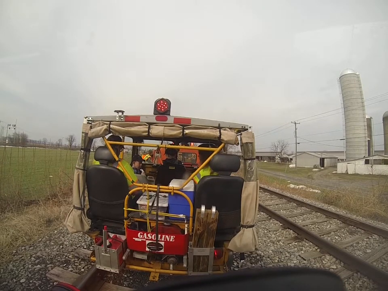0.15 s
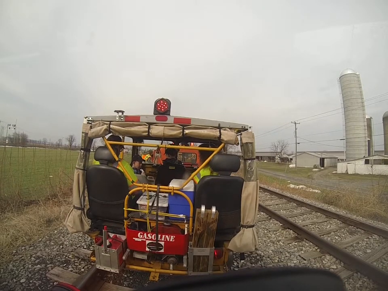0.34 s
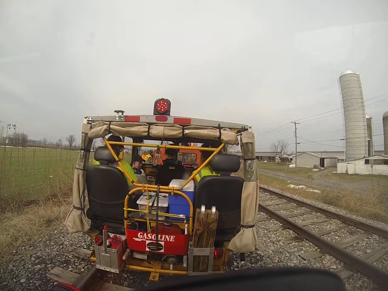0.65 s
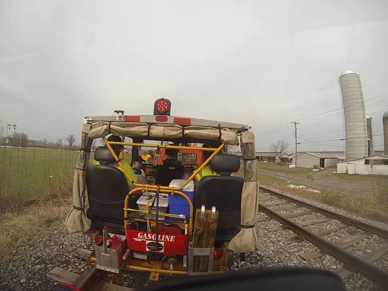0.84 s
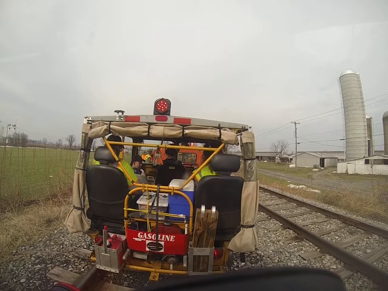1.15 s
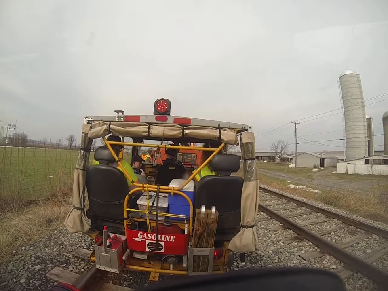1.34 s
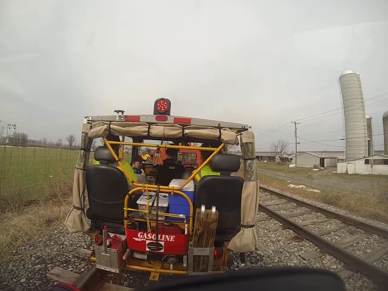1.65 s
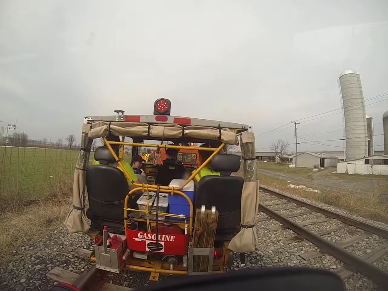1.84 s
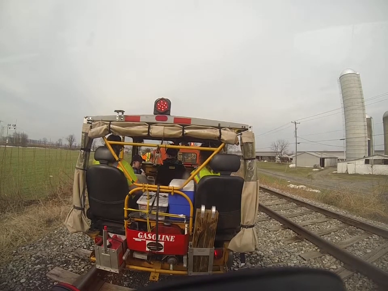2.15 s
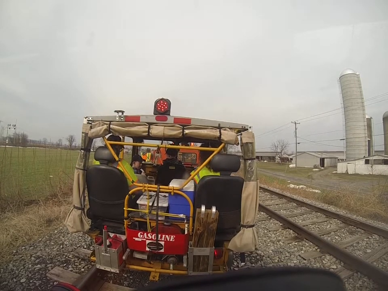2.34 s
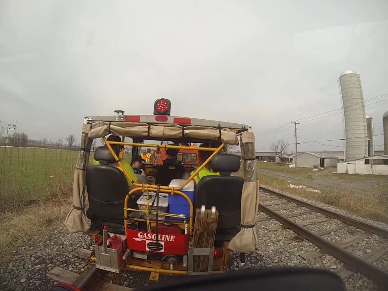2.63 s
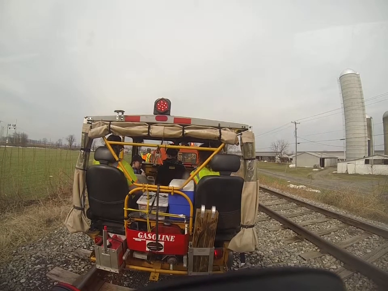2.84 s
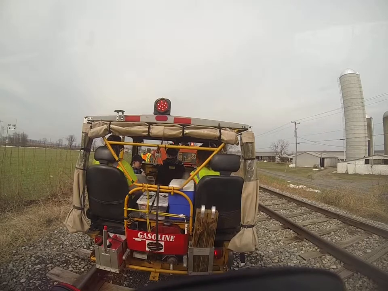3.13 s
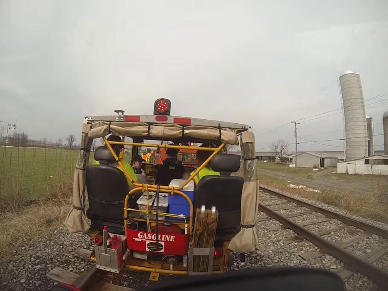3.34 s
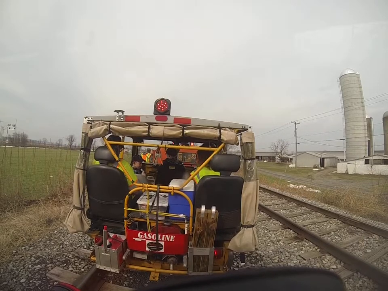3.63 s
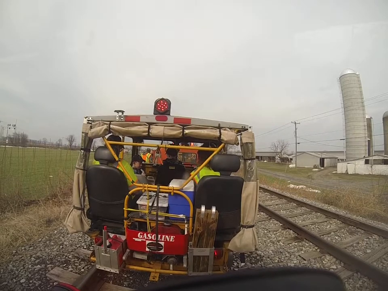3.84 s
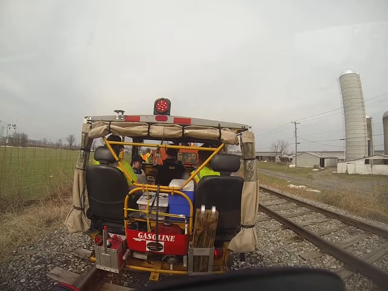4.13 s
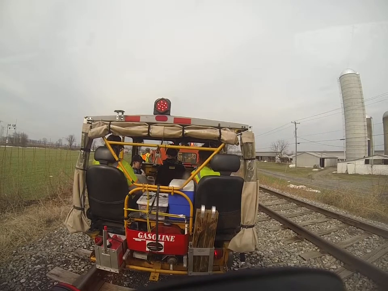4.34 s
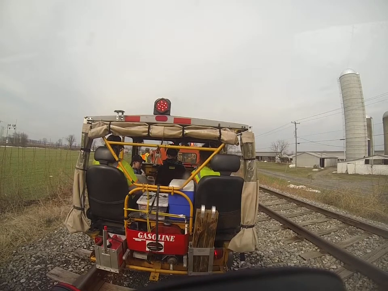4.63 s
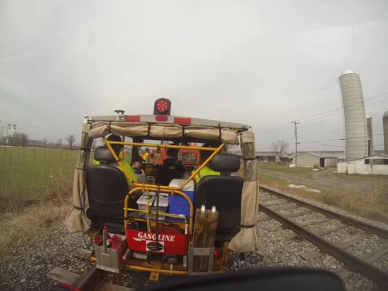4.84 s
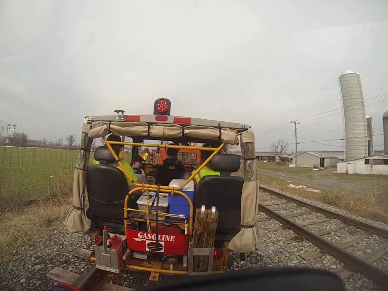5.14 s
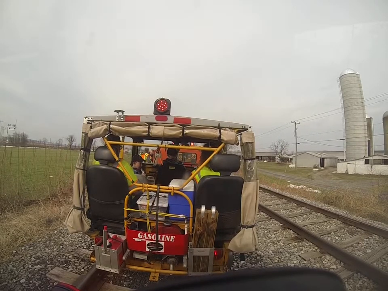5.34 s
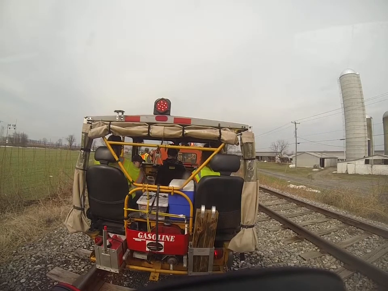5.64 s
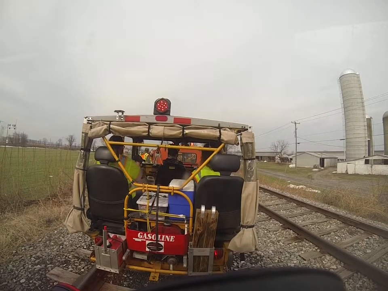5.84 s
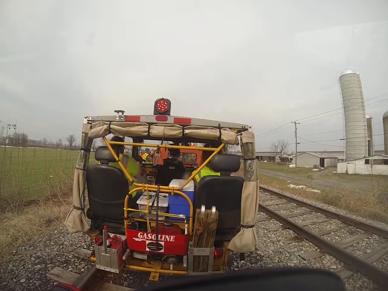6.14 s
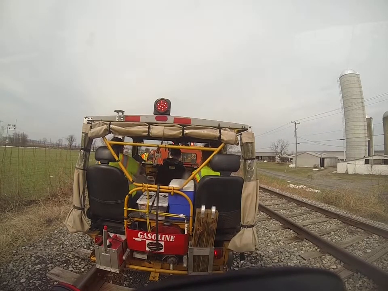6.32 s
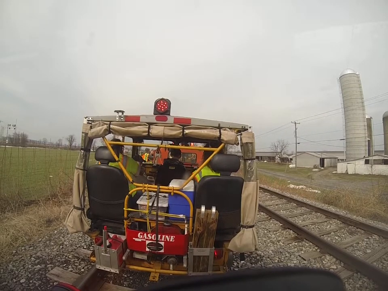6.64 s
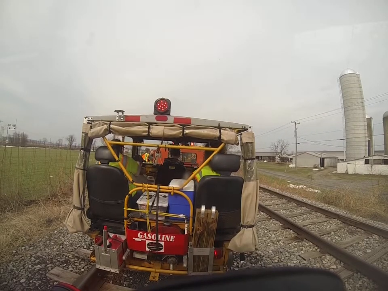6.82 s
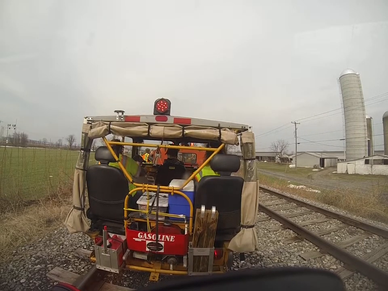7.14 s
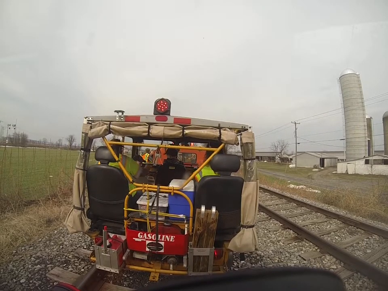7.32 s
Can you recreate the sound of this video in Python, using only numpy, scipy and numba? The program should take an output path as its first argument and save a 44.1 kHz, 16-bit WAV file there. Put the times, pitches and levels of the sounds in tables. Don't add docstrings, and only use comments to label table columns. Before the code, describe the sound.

A small engine idles with a deep, lumpy, fast throb, its metal cowling rattling and a loose panel ticking, overloaded with constant crackle.

```python
import sys
import numpy as np
from scipy import signal
from scipy.fft import rfft, irfft, next_fast_len
from scipy.io import wavfile
from scipy.ndimage import map_coordinates
from numba import njit

SR = 44100
rng = np.random.default_rng(int(sys.argv[2]) if len(sys.argv) > 2 else 0)


def boost_factor(decibels):
    exponent = np.asarray(decibels, float) / 20
    return 10 ** exponent


def to_wav(sig):
    pcm = np.clip(np.atleast_2d(sig), -1, 1) * 32767
    pcm = np.round(pcm).astype(np.int16)
    wavfile.write(sys.argv[1], SR, pcm.T)


N = 329868

# time in seconds, then engine cycles, pulley turns, turns of the five-blade fan,
# cycles of the car ahead and flywheel turns, all in Hz.
SPEED = [(0.0, 12.743, 12.864, 12.708, 14.041, 20.363), (0.44, 12.864, 12.979, 12.937, 14.469, 20.764),
         (0.88, 13.005, 13.071, 13.032, 14.415, 20.341), (1.32, 13.02, 13.055, 13.091, 14.533, 20.084),
         (1.76, 12.759, 13.004, 12.895, 14.503, 20.37), (2.2, 12.741, 12.707, 12.874, 14.512, 20.27),
         (2.64, 12.692, 12.731, 12.737, 14.651, 20.265), (3.08, 12.814, 12.884, 12.845, 14.534, 20.274),
         (3.52, 12.794, 12.869, 12.867, 14.674, 20.176), (3.96, 12.832, 12.914, 12.879, 14.401, 19.978),
         (4.4, 12.872, 12.984, 12.979, 14.594, 19.599), (4.84, 13.055, 13.128, 13.116, 14.422, 20.14),
         (5.28, 13.042, 13.124, 13.106, 14.442, 20.269), (5.72, 13.179, 13.267, 13.265, 14.355, 20.069),
         (6.16, 13.146, 13.228, 13.189, 14.332, 20.061), (6.6, 13.21, 13.3, 13.324, 14.447, 20.227),
         (7.04, 13.243, 13.293, 13.279, 14.339, 20.447), (7.48, 13.331, 13.407, 13.418, 14.364, 20.795)]
START_TURNS = (.024, .028, -.006, .875, .48)
# time in seconds, then frame shake, exhaust, belt grip, fan bite, car ahead
# and flywheel, all in dB over their means.
EFFORT = [(0.0, 2.7, 1.7, -11, 1.8, 3.5, -17.5), (0.44, 1, -0.5, -8.5, 0, -2, -10.5),
          (0.88, -1.1, 0.2, 0, 0.5, 0.6, -1.5), (1.32, -2.5, -0.84, 0.5, -8.0, 0.4, 1.5),
          (1.76, -0.7, -1.8, 1.5, -2, 1.5, 1.5), (2.2, 1.4, -4.5, -2.1, -4.5, 3.1, 3),
          (2.64, -1, -1.84, 0.2, -2, -4.5, -2.1), (3.08, -2.8, -2.1, 0.8, 1, -2, 2.5),
          (3.52, 0.4, 1.1, -4, 0, -2, -0.9), (3.96, 0.9, -2.3, 2.1, 2, -2, -0.8),
          (4.4, 2.25, 0.6, -9.5, 0, 2, -4), (4.84, 0.8, 2, 0.5, 1.94, -3.4, 0.8),
          (5.28, -0.5, 0, -0.8, -0.9, -4, 3), (5.72, -3, -3.5, -0.3, -0.96, 1.3, 0.4),
          (6.16, -3, -1.5, -1, -0.1, -3.5, 2), (6.6, -2, -2.5, 0.1, -1.8, 1.5, 2.5),
          (7.04, -1.8, -3.5, -0.9, -2.5, -1, 3), (7.48, -0.6, -2.5, 4, 0.5, 4.5, 1.9)]


def unit(x):
    return x / np.sqrt(np.mean(x ** 2) + 1e-20)


def curves(rows):
    s, *cols = np.transpose(rows)
    return [np.interp(np.arange(N) / SR, s, c) for c in cols]


def wobble(rate):
    knots = rng.standard_normal(int(N * rate / SR) + 4)
    return map_coordinates(knots, [np.arange(N) * rate / SR], order=1)


def filtered(x, response):
    m = next_fast_len(N + SR // 2)
    return irfft(rfft(x, m) * response(np.fft.rfftfreq(m, 1 / SR)), m)[..., :N]


def coloured(points):
    f, db = np.transpose(points)

    def outline(hz):
        return boost_factor(np.interp(np.log(hz + 1), np.log(f + 1), db))

    return unit(filtered(rng.standard_normal(N), outline))


def ringing(x, modes, order):
    def response(f):
        total = 0
        for k, (centre, width, db) in enumerate(modes):
            peak = 1j * f * width / (centre * centre - f * f + 1j * f * width)
            total = total + (-1) ** k * boost_factor(db) * peak ** order
        return total

    return unit(filtered(x, response))


def tone(turns, k, db, rough_db, pushes=((0, 1),)):
    lead = np.angle(sum(size * np.exp(-2j * np.pi * k * angle) for angle, size in pushes))
    wander = .008 * k * rough_db * wobble(3)
    level = np.sqrt(2) * boost_factor(db + rough_db * wobble(4))
    return level * np.cos(2 * np.pi * k * turns + lead + wander)


def engine():
    # multiple of the cycle, engine level in dB, pulley level in dB.
    orders = [(2, -32, -43.5), (3, -23.5, -30.5), (4, -18, -32.5), (6, -39, -41.5), (7, -37.5, -34),
              (8, -31, -53.5), (9, -31.5, -46), (10, -30, -35), (11, -27, -46), (12, -27, -42),
              (13, -33.5, -42), (14, -31.5, -37.5), (15, -33.5, -54.5), (16, -45.5, -62), (17, -45.5, -62),
              (18, -48.5, -77)]
    # multiple of the cycle, level in dB.
    upper_orders = [(19, -50.5), (20, -50), (21, -53), (22, -58), (23, -62.5), (24, -57.5), (26, -56)]
    engine_pushes = [
        (0.05, -0.47),
        (0.221, 1.0),
        (0.312, -0.72),
        (0.382, 0.67),
        (0.579, -0.36),
        (0.869, -0.26),
    ]
    pulley_pushes = [
        (0.286, 0.77),
        (0.376, 0.73),
        (0.671, 1.0),
        (0.912, 0.75),
    ]
    fan_mean_db = -18.5
    muffler_hz, muffler_wide_hz, muffler_db = 198.5, 4.4, -22.5
    pipe_hz, pipe_wide_hz, pipe_db = 177.2, 4.5, 3.5

    engine_hz, pulley_hz, fan_hz = curves(SPEED)[:3]
    cycles, pulley, fan = (np.cumsum(hz) / SR + start
                           for hz, start in zip((engine_hz, pulley_hz, fan_hz), START_TURNS))
    frame_db, exhaust_db, belt_db, fan_db = curves(EFFORT)[:4]

    def bell(k, hz, wide_hz):
        return np.exp(-((k * engine_hz - hz) / wide_hz) ** 2)

    def muffled_db(k):
        dead = muffler_db * bell(k, muffler_hz, muffler_wide_hz)
        return 0.74 + dead + pipe_db * bell(k, pipe_hz, pipe_wide_hz)

    low = sum(tone(cycles, round(k), db + frame_db, 0.44, engine_pushes) for k, db, _ in orders[:5])
    exhaust = sum(tone(cycles, round(k), db + exhaust_db + muffled_db(k), 1.4, engine_pushes)
                  for k, db, _ in orders[5:])
    buzz = sum(tone(cycles, round(k), db + exhaust_db, 1.7, engine_pushes) for k, db in upper_orders)
    belt = sum(tone(pulley, round(k), db + belt_db + 1.0, 1.0, pulley_pushes) for k, _, db in orders[:13])
    blades = tone(5 * fan, 1, fan_mean_db + fan_db, .4)
    return low + exhaust + buzz + belt + blades + cowling(cycles)


def cowling(cycles):
    # time in seconds, level in dB.
    rattle_rows = [(0, -40.5), (.5, -45), (1.02, -43.5), (1.25, -43), (1.8, -40), (2.2, -44.5),
                   (2.71, -45.5), (3.35, -44.5), (3.7, -45), (4.2, -42.5), (4.6, -40.5), (5.1, -40.5),
                   (5.37, -42.5), (5.7, -43), (6.12, -45), (6.6, -41), (7.1, -40.5), (7.48, -41)]
    # frequency in Hz, width in Hz, level in dB.
    panel_modes = [(1109, 38, -4), (1160.6, 50, 2.5), (1235, 61, -1.5), (1273, 36, 1), (1298, 44, -4.5),
                   (1402, 45, -9.5), (1469, 32, -5)]
    # frequency in Hz, width in Hz, level in dB.
    tin_modes = [(435, 26, -4.5), (617, 45, -4), (702.7, 49, -5.5), (888, 60, -10.5), (2050, 190, -18),
                 (2668, 110, -21)]
    # frequency in Hz, level in dB per Hz.
    air_spectrum = [(150, -27), (215, -7), (240, -9), (310, -15.5), (470, -14.5), (540, -20), (960, -24),
                    (1250, -17.5), (1600, -26.5), (3100, -38), (3300, -41.5), (6500, -47), (10500, -54),
                    (12500, -80.5)]
    rattle_db = curves(rattle_rows)[0] - 1.5

    def swell(depth_db, late_turns):
        return boost_factor(depth_db * np.cos(2 * np.pi * (cycles - late_turns)) + 0.63 * wobble(25))

    knocks = (rng.random(N) < .012) * rng.standard_normal(N)
    drive = unit(swell(1.0, 1.0) * (unit(knocks) + 0.99 * rng.standard_normal(N)))
    panels = boost_factor(rattle_db) * ringing(drive, panel_modes, order=2)
    tin = boost_factor(0.5 * (rattle_db + 45.5) - 50.0) * ringing(drive, tin_modes, order=2)
    hiss = boost_factor(.5 * (rattle_db + 41.5) - 38.5) * unit(swell(0.59, .85) * coloured(air_spectrum))
    return panels + tin + hiss


def neighbours():
    # multiple of the cycle, level in dB.
    far_orders = [(2, -45.5), (3, -34), (3.5, -43), (4, -29), (6, -41.5), (8, -50.5), (9, -44.5),
                  (12, -50.5)]
    # frequency in Hz, level in dB per Hz.
    rumble_spectrum = [(8, -19), (25, -1), (45, 1), (75, -3.5), (95, -6.5), (125, 1.5), (180, -2),
                       (200, -15), (260, -32), (320, -120)]
    wheel_mean_db = -20.5
    far, wheel = (np.cumsum(hz) / SR + start for hz, start in zip(curves(SPEED)[3:], START_TURNS[3:]))
    far_db, wheel_db = curves(EFFORT)[4:]
    car = sum(tone(far, round(2 * k) / 2, db + far_db, 1.3) for k, db in far_orders)
    drone = tone(wheel, 1, wheel_mean_db + wheel_db, .3)
    return car + drone + boost_factor(-31.0) * coloured(rumble_spectrum)


def whine():
    # time in seconds, level in dB.
    whine_rows = [(0, -74.5), (.9, -75), (1.1, -73), (1.5, -72), (2, -75), (2.6, -77), (3.1, -76.5),
                  (3.6, -76.5), (4.2, -75.5), (4.8, -76.5), (5.4, -77), (5.8, -72.5), (6.2, -69),
                  (6.5, -79), (7, -76), (7.48, -71)]
    # frequency in Hz, width in Hz, level in dB.
    bearing_modes = [(5020, 33, -2), (5110, 70, -4.5)]
    level = boost_factor(curves(whine_rows)[0] + 3.9 * wobble(14))
    return level * ringing(rng.standard_normal(N), bearing_modes, order=2)


def hard_firings():
    # start in seconds, crackle level in dB.
    firing_rows = [(0.0142, -42.5), (0.0216, -42), (0.0935, -42), (0.1009, -41), (0.1708, -39.5), (0.1811, -44.5),
                   (0.2489, -43), (0.2573, -39), (0.328, -41.5), (0.336, -46.5), (0.4047, -39.5), (0.482, -39.5),
                   (0.559, -38.5), (0.6274, -45), (0.638, -37.5), (0.7148, -41), (0.781, -40.5), (0.793, -43),
                   (0.8694, -42.5), (0.8789, -44.5), (0.934, -43.5), (0.9454, -39.5), (1.0121, -40.5),
                   (1.0323, -40.5), (1.0998, -39.8), (1.2529, -42.6), (1.3181, -40), (1.4723, -37.5),
                   (1.5036, -41.5), (1.5705, -42.5), (1.628, -45), (1.6403, -44), (1.66, -42), (1.6702, -40.5),
                   (1.7437, -42.5), (1.7582, -45), (1.792, -41.5), (1.8251, -41.5), (1.837, -42.3), (1.862, -44),
                   (1.9306, -42.0), (1.9482, -40.5), (1.963, -43.5), (2.0187, -44.5), (2.0578, -39.5),
                   (2.086, -42), (2.1131, -45.5), (2.188, -38.5), (2.2164, -39.5), (2.2874, -43.5), (2.3453, -42),
                   (2.3546, -42.5), (2.442, -41.0), (2.5028, -43.5), (2.511, -35.5),
                   (2.58, -39.5), (2.5915, -47), (2.6003, -46), (2.6086, -40), (2.6783, -40.5), (2.738, -37.5),
              (2.7478, -40), (2.8368, -42), (2.8956, -38.5), (2.9043, -34), (2.9743, -43.5),
              (3.0022, -42.5), (3.0595, -41), (3.1296, -40.5), (3.1389, -41), (3.1955, -46.5),
              (3.2233, -45.5), (3.2712, -39), (3.2944, -37.5), (3.3657, -46.5), (3.4266, -42.5),
              (3.4512, -38), (3.5196, -38), (3.5871, -41.5), (3.6127, -43), (3.6768, -37.5),
              (3.6855, -42.5), (3.7428, -39.5), (3.757, -45), (3.7678, -44.5), (3.8181, -44.3),
              (3.834, -45), (3.8414, -42.5), (3.8982, -37.5), (3.9108, -40), (3.998, -42.0), (4.0383, -44),
              (4.055, -41.5), (4.0648, -41), (4.1026, -45), (4.127, -45.5), (4.1328, -39), (4.1936, -38.5),
              (4.2194, -42), (4.288, -39), (4.4188, -40.5), (4.4445, -41), (4.5291, -42.5), (4.5737, -41.5),
              (4.5852, -45.5), (4.631, -41.5), (4.6394, -44), (4.7026, -44.5), (4.7275, -41),
              (4.7398, -45.5),
                   (4.784, -42.6), (4.8182, -41.5), (4.8506, -42.5), (4.8796, -43.5), (4.9388, -42.5),
            (4.9459, -42.5), (4.971, -43), (5.0036, -42.5), (5.0732, -42.5), (5.0912, -42.5), (5.101, -44),
            (5.1241, -43), (5.1581, -44.2), (5.167, -42), (5.1855, -44), (5.2255, -40.5), (5.3208, -40.5),
            (5.3777, -40), (5.386, -42), (5.456, -46), (5.4738, -42), (5.5301, -39), (5.5398, -41),
            (5.5831, -46.5), (5.6078, -44), (5.6828, -40), (5.691, -43), (5.7498, -42.5), (5.7586, -39),
            (5.8421, -40), (5.9111, -39), (5.994, -40), (6.0617, -35.0), (6.1367, -44), (6.1462, -39),
            (6.2137, -36), (6.2734, -46), (6.281, -42.5), (6.3647, -37), (6.5175, -40), (6.582, -38),
            (6.6639, -38), (6.7333, -41), (6.8434, -45.1), (6.8849, -38), (6.9503, -45), (6.979, -43.5),
            (7.035, -38.5), (7.0999, -44.5), (7.186, -44), (7.251, -41), (7.2608, -43), (7.269, -44.5),
            (7.3777, -42.5), (7.4701, -42)]
    step_s, pace_spread = 0.00041, .15
    faint_db, steps_per_db = -45.5, 0.852
    rush = np.zeros(N)
    rows = firing_rows
    for (s, db), u in zip(rows, rng.standard_normal(len(rows))):
        steps = max(1 + steps_per_db * (db - faint_db), 1)
        gap = step_s * SR * np.exp(pace_spread * u)
        rush[round(s * SR):][:round(steps * gap)] = 1 / gap
    return rush


@njit
def stepped_gain(x, scatter, rush, top, slope, hold, step, rest, roof):
    gain, level, crest, charge, calm = np.empty(len(x)), 1.0, 0.0, 0.0, 0.0
    for i in range(len(x)):
        crest = max(abs(x[i]) * level, crest * hold)
        inflow = rush[i] if rush[i] > 0 else slope * (crest - top)
        charge = max(charge + inflow, -0.4)
        calm += 1
        if charge > 1:
            level, charge = level / step, scatter[i]
        elif calm > rest and crest < top and level < roof and rush[i] == 0:
            level, calm = level * step, 0.0
        gain[i] = level
    return gain


def slaps():
    # start in seconds, peak level in dB, ring frequency in Hz.
    slap_rows = [(0.09, -29, 1280), (0.168, -35, 1160), (0.3137, -31, 1220), (0.4684, -32, 1254),
                 (0.6052, -26, 1280), (0.6803, -34, 1250), (0.9415, -30, 1240), (1.1635, -32.5, 1190),
                 (1.255, -26, 1150), (1.4506, -30, 1270), (1.509, -27, 1126), (1.5594, -28, 1150),
                 (1.5938, -32, 1250), (1.691, -38, 1250), (1.73, -28, 1140), (1.7933, -32, 1260),
                 (1.8818, -30, 1150), (1.932, -32, 1230), (1.993, -33, 1090), (2.0403, -29, 1260),
                 (2.2673, -32, 1120), (2.399, -35, 1240), (2.8967, -31, 1140), (2.939, -35, 1290),
                 (3.049, -30, 1160), (3.1224, -37, 1150), (3.257, -31, 1140), (3.6718, -26.5, 1280),
                 (3.7537, -36, 1150), (3.8331, -31, 1130), (3.896, -28, 1240), (3.9833, -33, 1160),
                 (4.139, -29, 1170), (4.191, -37, 1290), (4.4218, -33, 1140), (4.482, -26, 1270),
                 (4.579, -26, 1270), (4.6845, -37, 1180), (4.882, -22.5, 1160), (4.96, -35, 1280),
                 (5.0666, -26, 1190), (5.1133, -28, 1275), (5.219, -26, 1210), (5.2978, -32, 1145),
                 (5.439, -36, 1160), (5.5215, -32, 1200), (5.583, -35, 1120), (5.729, -31, 1210),
                 (6.2035, -39, 1090), (6.3614, -36, 1160), (6.5771, -41, 1160), (6.8226, -28, 1240),
                 (6.8609, -31, 1150), (6.9247, -29, 1110), (6.972, -28, 1270), (7.0509, -36, 1250),
                 (7.1087, -28, 1290), (7.151, -33, 1293), (7.336, -35, 1240), (7.3914, -27.5, 1210)]
    spreads, t60_s, trim_db = (.005, 0.046), .08, -3
    out, t = np.zeros(N + SR), np.arange(SR // 10) / SR
    for (s, db, hz), pair in zip(slap_rows, rng.standard_normal((len(slap_rows), 2))):
        ring = sum(size * np.sin(2 * np.pi * hz * (1 + spread * u) * t)
                   for u, size, spread in zip(pair, (.9, .4), spreads))
        envelope = boost_factor(db + trim_db - 60 * t / t60_s) * (1 - np.exp(-t / 0.003))
        out[round(s * SR):][:len(t)] += envelope * ring
    return out[:N]


def scene():
    return (engine() + neighbours() + slaps() + whine())[None]


def low_pass(x):
    return signal.sosfilt(signal.butter(12, 15800, fs=SR, output="sos"), x)


def record(dry):
    scatter = .8 * rng.random(N) - .4
    gain = stepped_gain(dry[0], scatter, hard_firings(), .64, .12, boost_factor(-.04), boost_factor(.46), .009 * SR, boost_factor(4))
    hot = dry * gain * boost_factor(-1.84)
    rounded = hot / (1 + np.abs(hot / .95) ** 4) ** (1 / 4)
    dull = filtered(rounded, lambda hz: 1 / (1 + 1j * hz / 6000) / (1 + (hz / 10500) ** 4))
    return low_pass(dull)


dry = scene()
out = record(dry)
to_wav(out)
```